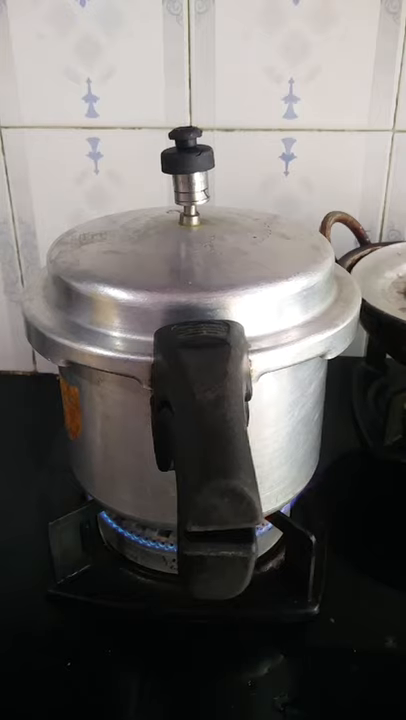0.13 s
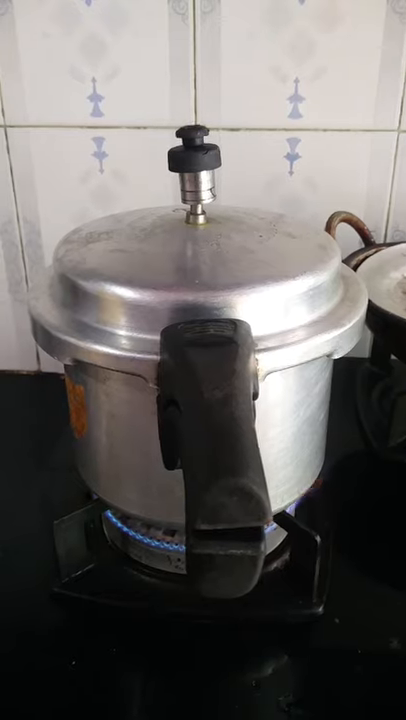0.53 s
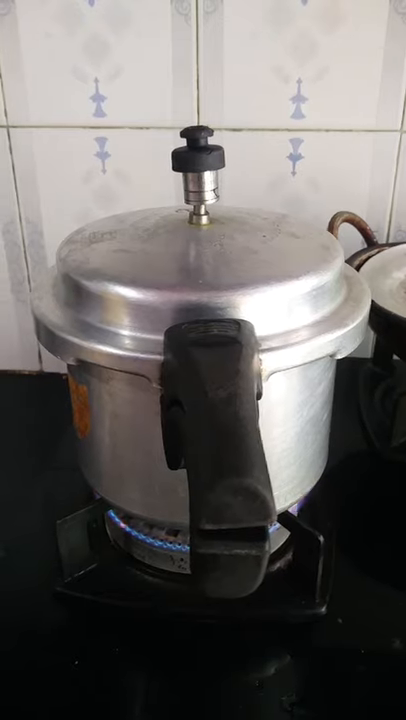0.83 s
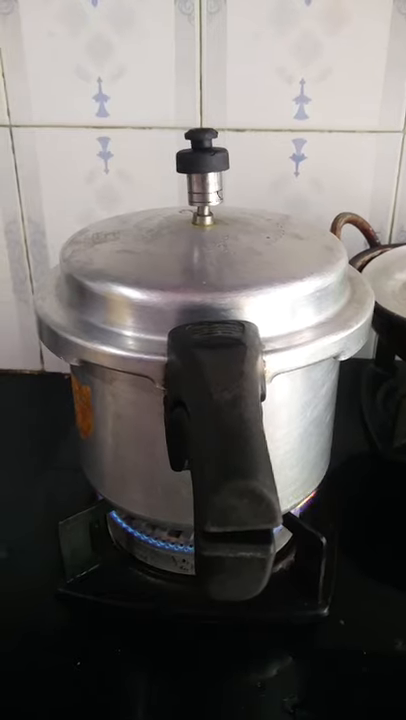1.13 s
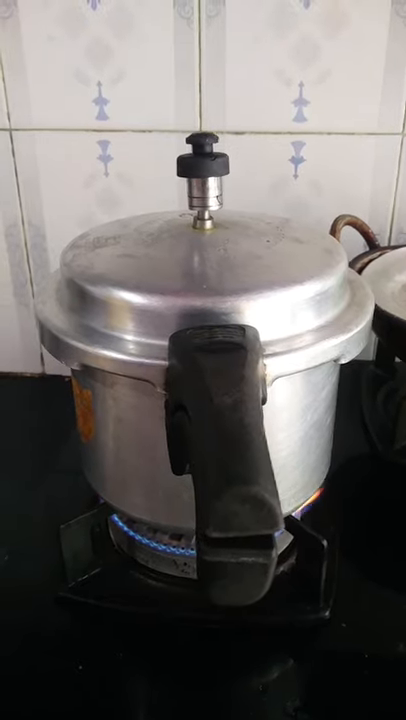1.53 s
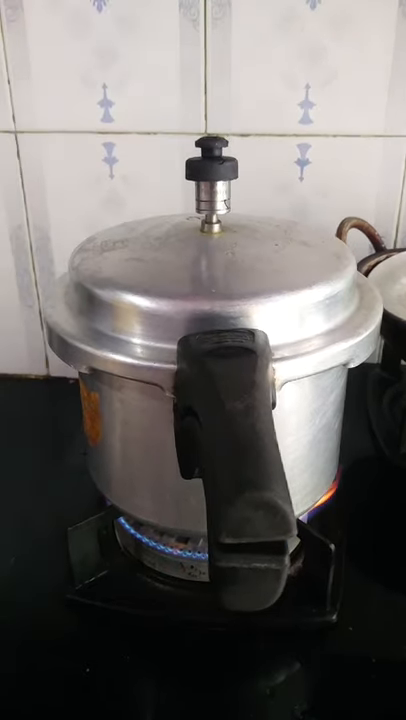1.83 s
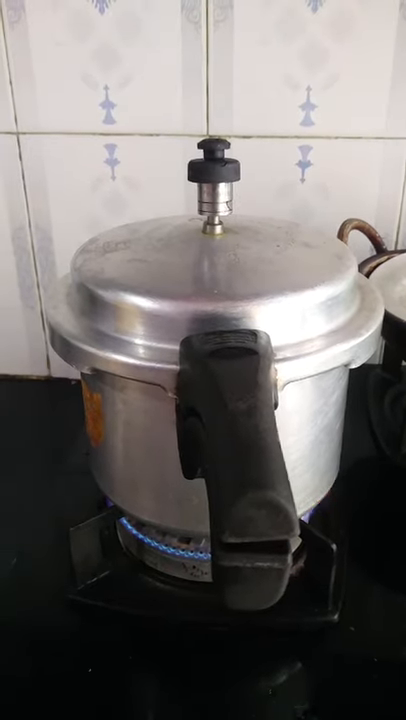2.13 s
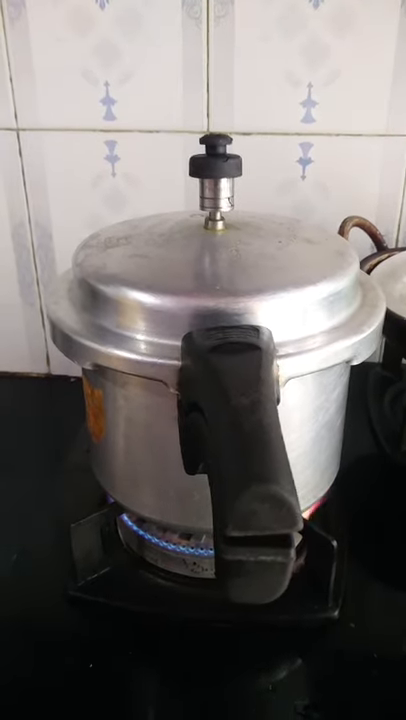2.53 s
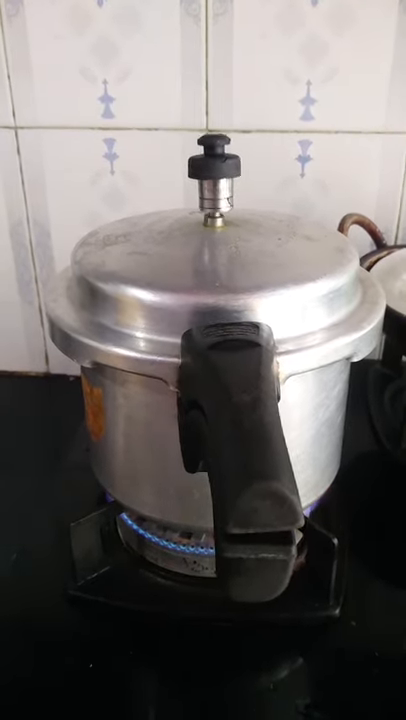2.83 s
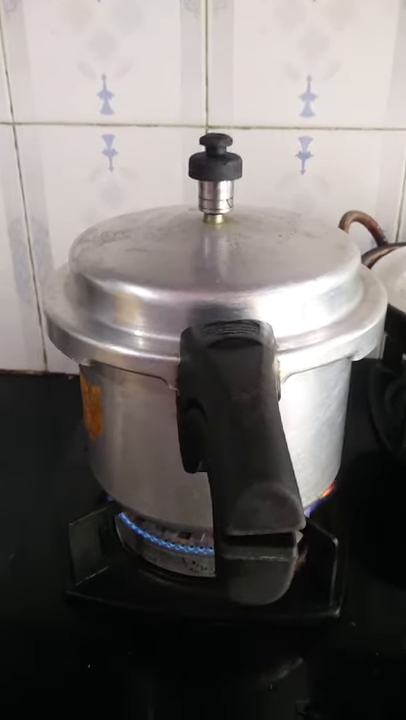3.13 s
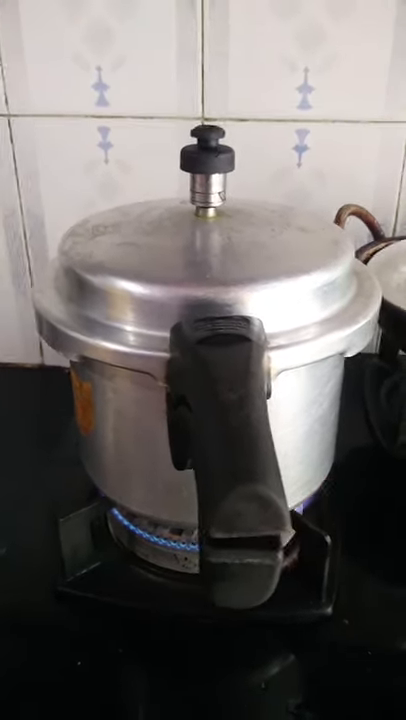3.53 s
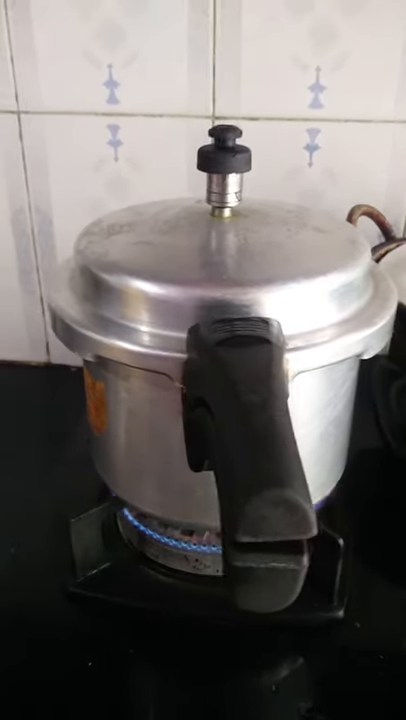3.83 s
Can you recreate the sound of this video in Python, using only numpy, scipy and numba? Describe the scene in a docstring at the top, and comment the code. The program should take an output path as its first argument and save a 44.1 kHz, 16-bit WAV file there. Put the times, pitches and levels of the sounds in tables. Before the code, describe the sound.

Loud steam hiss from a pressure cooker stops abruptly, leaving a few brief, high whistles.

```python
"""Pressure cooker letting off steam

Close to a phone in a tiled kitchen, steam blows out under a cooker's lifted weight valve.
For three seconds the jet hisses, rings the valve and overloads the microphone into a low rasp;
then the weight drops shut with a small knock.
Steam leaking past the seat gives three short whistles over the low murmur of the gas burner."""
import sys
import numpy as np
from scipy import signal
from scipy.fft import rfft, irfft
from scipy.io import wavfile
from numba import njit

SR = 44100
rng = np.random.default_rng(int(sys.argv[2]) if len(sys.argv) > 2 else 0)


def generate_wav(signal):
    """Clip the signal to [-1, 1] and save it as 16-bit WAV at the path in sys.argv[1]."""
    frames = np.transpose(np.atleast_2d(signal))
    scaled = np.clip(frames, -1, 1) * 32767
    pcm = np.round(scaled).astype(np.int16)
    wavfile.write(sys.argv[1], SR, pcm)


N = 176400
BIN_HZ = np.arange(N // 2 + 1) * SR / N
SHUT_S = 2.969  # the weight starts to seal the vent
ROOM_T60_LOW_S, ROOM_T60_HIGH_S = 0.34, 0.28


def undb(db):
    """Decibels to gain."""
    return 10 ** (np.asarray(db) / 20)


def unit(x):
    """Scale to rms 1."""
    return x / np.sqrt(np.mean(x ** 2))


def on_bins(points):
    """Draw a curve through (Hz, value) points on a log frequency axis."""
    hz, value = np.array(points).T
    return np.interp(np.log(BIN_HZ + 1), np.log(hz), value)


def coloured(spectrum, grain=1):
    """Noise shaped in time by grain, then by an EQ curve; rms 1."""
    return unit(irfft(rfft(rng.standard_normal(N) * grain) * undb(on_bins(spectrum)), N))


def pan(db):
    """Constant-power stereo gains, the left db above the right."""
    gains = undb(np.array([db, -db]).reshape(2, -1) / 2)
    return gains / np.sqrt(np.mean(gains ** 2, axis=0))


def walk(hz):
    """Smooth random modulation up to the given rate; rms 1."""
    return unit(irfft(rfft(rng.standard_normal(N)) / (1 + (BIN_HZ / hz) ** 4), N))


@njit
def sweep_filter(x, hz, width_hz):
    """State-variable band-pass with a moving centre."""
    y, band_state, low_state = np.empty(len(x)), 0., 0.
    for i in range(len(x)):
        g, damping = np.tan(np.pi * hz[i] / SR), width_hz / hz[i]
        v = (band_state + g * (x[i] - low_state)) / (1 + g * (g + damping))
        band_state, low_state = 2 * v - band_state, low_state + 2 * g * v
        y[i] = damping * v
    return y


def band(hz, width_hz):
    """Turbulence in a steep resonance, roughly width_hz wide; rms 1."""
    centre, stage_width = hz + np.zeros(N), 1.77 * width_hz
    once = sweep_filter(rng.standard_normal(N), centre, stage_width)
    return unit(sweep_filter(once, centre, stage_width))


def walls(t60):
    """One stereo tail of dense reflections off the tiles."""
    t = np.arange(SR // 2) / SR
    tail = rng.standard_normal((2, len(t))) * undb(-60 * t / t60) * np.minimum(t / 0.0031, 1)
    return tail / np.sqrt(np.sum(tail ** 2, axis=1, keepdims=True))


def kitchen(x, t, wet_db, t60, tails=1):
    """Direct sound, later on the left, plus reverb; several tails crossfade as the phone moves."""
    lag_s = np.array([[0.00017], [0]])
    direct = irfft(rfft(x) * np.exp(-2j * np.pi * BIN_HZ * lag_s), N)
    place = t / t[-1] * (tails - 1)
    wet = 0
    for k in range(tails):
        blend = np.sqrt(np.maximum(1 - abs(place - k), 0))
        wet += signal.fftconvolve(x, walls(t60), axes=1)[:, :N] * blend
    return (direct + undb(wet_db) * wet) / np.hypot(1, undb(wet_db))


def burner():
    """The gas flame's low murmur, wide and gently wavering."""
    # tone of the flame and the room: freq_hz, relative_db
    spectrum = [(25, -15.5), (70, -6), (120, 2), (170, 3), (240, -6.5), (350, -4.5), (440, -13), (520, 1),
                (600, -7), (700, -8), (1100, -17), (2000, -24.5), (4000, -25.5), (6000, -24.5),
                (9000, -40.5)]
    murmur = np.array([coloured(spectrum) for _ in range(2)])
    return murmur * undb(-66.5 + 1.2 * walk(hz=8)) * pan(db=3)


def rustles(t):
    """Soft, short noises around the stove."""
    # puffs of band noise: start_s, length_s, centre_hz, width_hz, level_db
    puffs = [(3.548, 0.13, 840, 347, -66.5), (3.55, .1, 1480, 250, -72.5), (3.735, 0.073, 2450, 250, -70.5),
             (3.863, .06, 540, 90, -65.5), (3.968, .05, 497, 111, -60.5)]
    out = 0
    for start, length, hz, width, db in puffs:
        fade = np.clip(np.minimum(t - start, start + length - t) / 0.01, 0, 1)
        out += band(hz, width) * undb(db) * fade
    return out * pan(db=13)


def clinks(t):
    """Faint, soft-edged rings of nearby metalware."""
    # metal rings: start_s, pitch_hz, level_db, t60_s
    rings = [(3.734, 2390, -64.5, .3), (3.745, 2730, -63, .25), (3.828, 778, -59, 0.48),
             (3.84, 2270, -78, .35)]
    out = 0
    for start, hz, db, t60 in rings:
        age = np.maximum(t - start, 0)
        out += np.sin(2 * np.pi * hz * age) * np.minimum(age / .012, 1) * undb(db - 60 * age / t60)
    return out * pan(db=16)


def swell(age, hold_s, attack_s=0.018, release_s=0.014):
    """A whistle's envelope: a quick rise, dying away once age passes hold_s."""
    return np.clip(age / attack_s, 0, 1) * np.exp(-np.maximum(age - hold_s, 0) / release_s)


def leak(t):
    """Steam seeps past the seat and catches into short whistles that sag and fray as they die."""
    # thin sizzle at the valve seat: time_s, centre_hz, level_db
    seep = [(3.0, 4850, -58), (3.11, 4630, -49), (3.17, 4350, -68), (3.22, 4470, -72), (3.27, 4360, -57),
            (3.33, 4400, -76), (3.52, 4270, -81), (3.56, 4100, -66.5), (3.7, 4330, -80), (3.93, 4240, -86),
            (4.0, 4270, -62)]
    # leak whistles: start_s, pitch_hz, level_db, hold_s
    whistles = [(3.271, 4416, -33.5, 0.026), (3.576, 4230, -42.5, 0.05), (3.973, 4200, -39, .03)]
    sag_hz_per_s, wobble_hz, fray_db = 2050, 40, -18
    times, hz, db = np.array(seep).T
    out = band(np.interp(t, times, hz), width_hz=170) * undb(np.interp(t, times, db)) * (t > SHUT_S)
    for start, pitch, level_db, hold in whistles:
        age = t - start
        glide = pitch - sag_hz_per_s * np.maximum(age - hold, 0) + wobble_hz * walk(hz=190)
        tone = np.sin(2 * np.pi * np.cumsum(glide) / SR) * swell(age, hold)
        fray = band(pitch - 230, width_hz=160) * swell(age - .026, hold)  # a lower, later hiss
        out += undb(level_db) * (tone + undb(fray_db) * fray)
    return out * pan(db=10.5)


def knock(t):
    """The weight lands with a dull clunk and sets the lid ringing."""
    # lid modes: pitch_hz, relative_db, t60_s
    lid = [(163, -8.5, 0.36), (590, -13.5, 0.61), (834, -5.5, 0.14), (1025, -5, .12), (1254, -1, .18),
           (2150, 0, 0.116), (2840, -2, 0.09), (2870, -1, .13), (3488, -19, .1)]
    # tone of the clunk: freq_hz, relative_db
    spectrum = [(40, -28), (130, -5), (300, -1), (500, -5), (800, 1.5), (1300, 2), (1700, -8), (2200, -1),
                (2900, -1.5), (4000, -17), (8000, -38)]
    land_s, decay_s = 3.005, 0.012
    age = np.maximum(t - land_s, 0)
    modes = sum(np.sin(2 * np.pi * hz * age) * undb(db - 60 * age / t60) for hz, db, t60 in lid)
    burst = (t > land_s) * np.exp(-age / decay_s)
    clunk = coloured(spectrum, burst) * np.sqrt(decay_s * SR / (2 * N))  # starts near rms 1
    return (undb(-37) * modes + undb(-25) * clunk) * pan(db=3.5)


def mic_overload_rasp(t):
    """Low crackling rasp of the right microphone port, overloaded by the hiss."""
    # tone of the rasp: freq_hz, relative_db
    spectrum = [(25, -16), (45, -7), (80, -1.5), (130, 1), (400, 0), (1000, 0.5), (2000, -1), (3500, 4.5),
                (7000, -33.5)]
    # its level ride: time_s, relative_db
    ride = [(0.0, -33), (0.29, -35.5), (0.31, -31), (0.35, -39.5), (0.41, -34), (0.48, -40), (0.53, -36),
            (1.07, -37.5), (1.71, -45.5), (1.88, -40.5), (2.24, -37.5), (2.34, -44.5), (2.4, -35),
            (2.46, -40), (2.65, -39), (2.97, -41.5)]
    crackle = undb(5.5 * walk(hz=1800))
    level_db = np.interp(t, *np.array(ride).T) + 4.5
    return coloured(spectrum, crackle) * undb(level_db) * pan(db=-37)


def jet_hiss():
    """The steam's broad, grainy hiss, split unevenly between the two microphone ports."""
    # tone of the hiss: freq_hz, relative_db
    spectrum = [(60, -44), (130, -30.5), (500, -25.5), (1000, -18), (1800, -11), (2300, -5), (3100, -3),
                (3900, -2.5), (4600, 2.5), (5800, 2), (6600, -1), (7300, -3.5), (7900, -13), (8900, -13.5),
                (9500, -25), (10000, -60)]
    # its stereo spread: freq_hz, left_minus_right_db
    sides = [(200, 5.5), (1800, -6), (2500, 0), (3900, -2), (4500, 4.5), (5300, -5), (6100, -7.5),
             (6600, -6.5), (7100, -19.5), (8700, -25), (9300, -11), (9800, 8.5)]
    grain = undb(1.7 * walk(hz=450))
    return irfft(rfft(coloured(spectrum, grain)) * pan(on_bins(sides)), N)


def valve_ring(jet_hz):
    """The valve's narrow resonances, each ringing most when the jet's band lies on it."""
    # resonances: centre_hz, width_hz, relative_db
    resonances = [(4390, 23, -15.5), (4950, 140, 2.5), (4970, 21, -7.5), (5315, 28, -3.5), (5580, 41, -19),
                  (5780, 28, 4), (5950, 80, 0.5)]
    reach_hz = 500
    ring = 0
    for hz, width, db in resonances:
        ring += band(hz, width) * undb(db + .8 * walk(hz=13)) / np.hypot(1, (hz - jet_hz) / reach_hz)
    return unit(ring) * pan(db=14.5)


def jet(t):
    """Fluttering steam: hiss, a wandering band and valve ring, plus the microphone's overload rasp."""
    # steam flow: time_s, relative_db, band_hz (before its swing is widened)
    contour = [(0.0, -17, 5310), (0.26, -18, 5300), (0.64, -18.5, 5455), (0.68, -19.5, 5180),
               (0.76, -17, 5250), (0.99, -20, 5390), (1.0, -17.5, 5443), (1.09, -20, 5090),
               (1.21, -21, 5360), (1.64, -22, 5580), (1.68, -20.5, 5630), (2.38, -19.5, 5410),
               (2.51, -20.5, 5740), (2.55, -19.5, 5480), (2.91, -21.5, 5430), (2.93, -25.5, 5505)]
    seal_s, flutter_db, band_swing = 0.028, 0.66, 1.8
    times, db, hz = np.array(contour).T
    flow_db, band_hz = np.interp(t, times, db), np.interp(t, times, hz)
    opening = np.exp(-np.maximum(t - SHUT_S, 0) / seal_s)
    flow = opening * undb(flutter_db * walk(hz=25))
    drive = flow * undb(flow_db)
    hiss = jet_hiss()
    centre_hz = band_hz.mean() + band_swing * (band_hz - band_hz.mean())
    focus_db = .6 * (flow_db - flow_db.mean())  # stronger flow brings the band forward
    core = band(centre_hz, width_hz=490) * undb(focus_db + 2 * walk(hz=4.7)) * pan(db=14)
    steam = drive * (undb(1) * hiss + undb(-5) * core)
    ring = drive * undb(-6.5) * valve_ring(centre_hz)
    rasp = flow * mic_overload_rasp(t)
    return (kitchen(steam, t, wet_db=-2, t60=ROOM_T60_HIGH_S, tails=6)
            + kitchen(ring, t, wet_db=-15.5, t60=ROOM_T60_HIGH_S)
            + kitchen(rasp, t, wet_db=-14, t60=ROOM_T60_LOW_S))


def scene():
    """The cooker and the stove in the kitchen."""
    t = np.arange(N) / SR
    foley = kitchen(knock(t) + rustles(t) + clinks(t), t, wet_db=-4, t60=ROOM_T60_LOW_S)
    return jet(t) + foley + kitchen(leak(t), t, wet_db=-4, t60=0.36) + burner()


def record(dry):
    """The phone drops the deepest bass, rounds the highest peaks and cuts the top."""
    low_cut_hz, ceiling, top_hz = 58, .85, 9900
    x = signal.sosfilt(signal.butter(3, low_cut_hz, "high", fs=SR, output="sos"), dry)
    x = x / (1 + (x / ceiling) ** 8) ** (1 / 8)
    return signal.sosfilt(signal.ellip(10, .2, 80, top_hz, fs=SR, output="sos"), x)


dry = scene()
out = record(dry)
generate_wav(out)
```